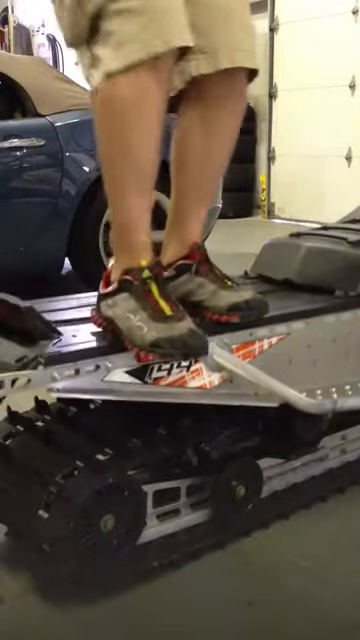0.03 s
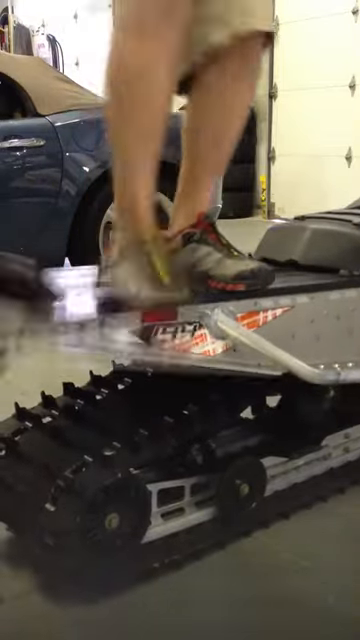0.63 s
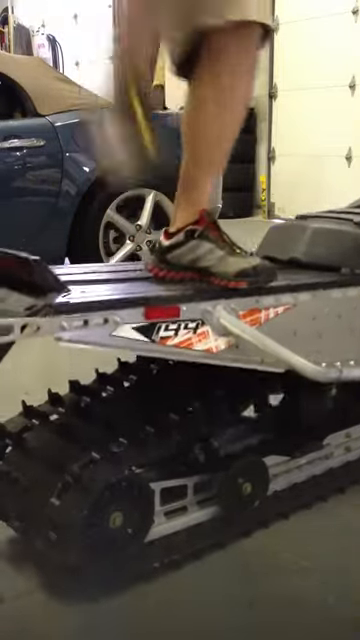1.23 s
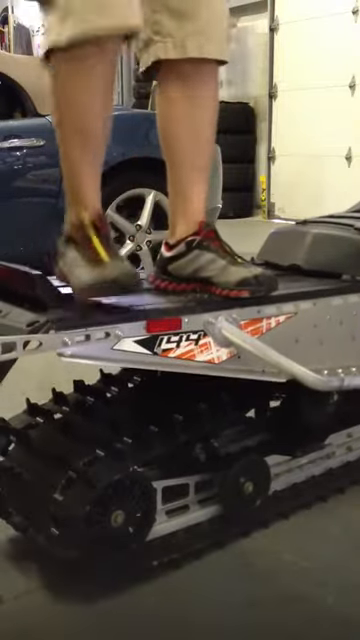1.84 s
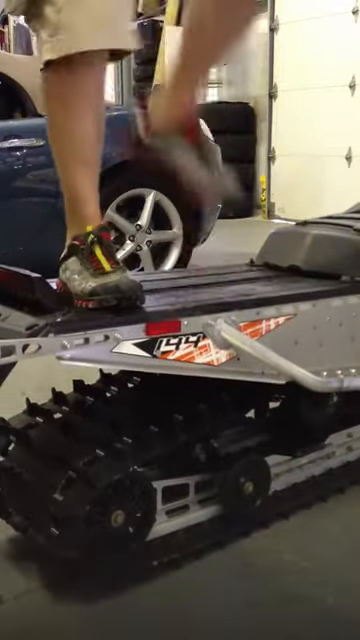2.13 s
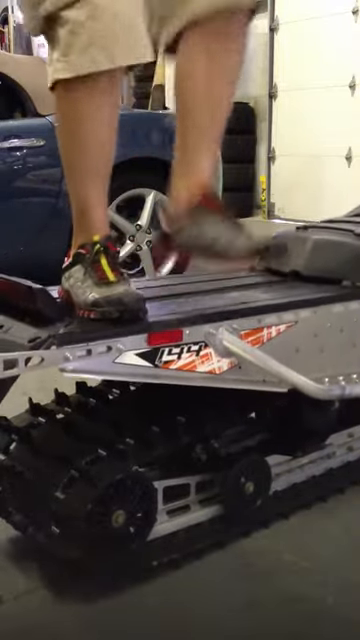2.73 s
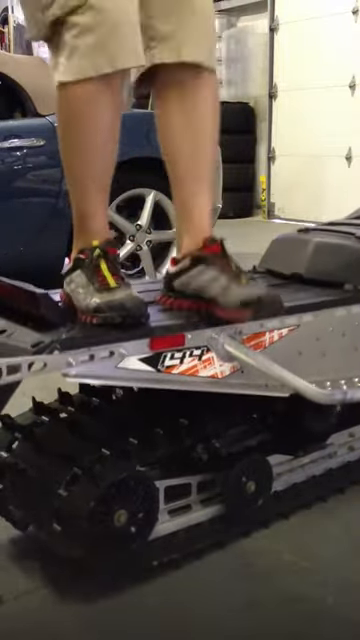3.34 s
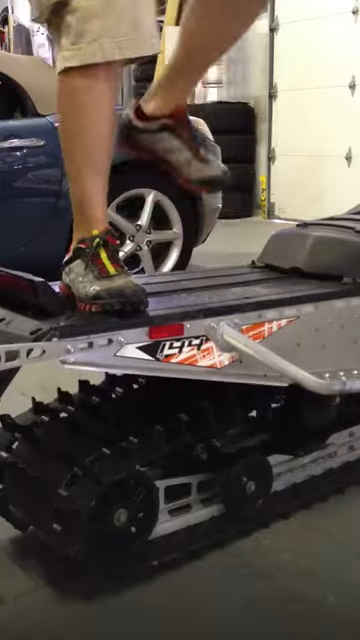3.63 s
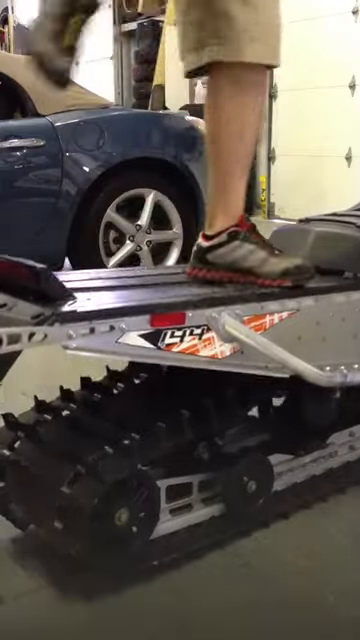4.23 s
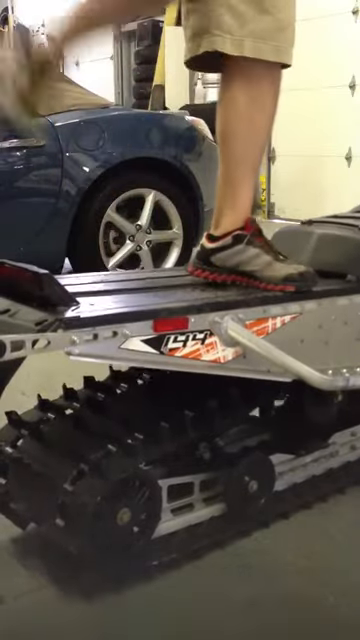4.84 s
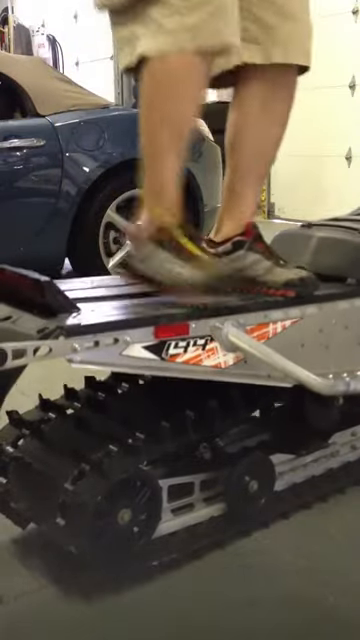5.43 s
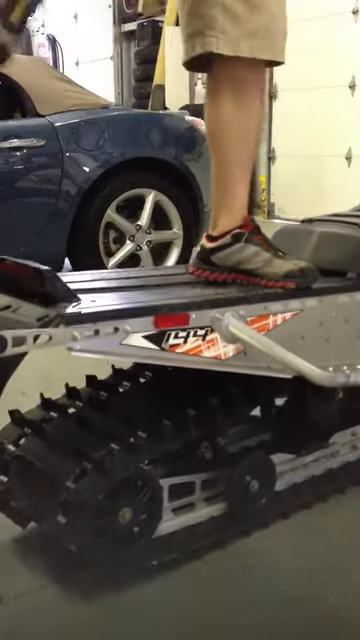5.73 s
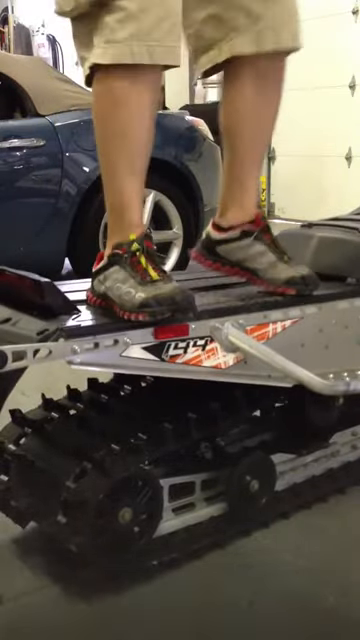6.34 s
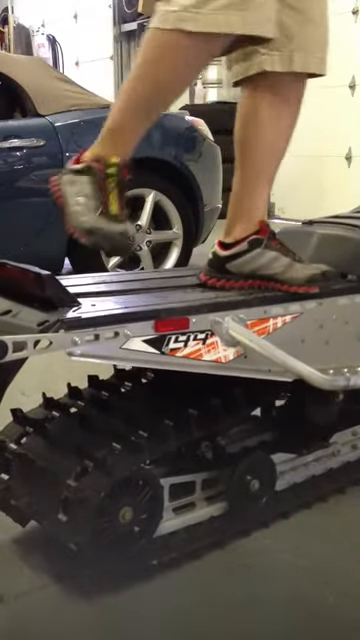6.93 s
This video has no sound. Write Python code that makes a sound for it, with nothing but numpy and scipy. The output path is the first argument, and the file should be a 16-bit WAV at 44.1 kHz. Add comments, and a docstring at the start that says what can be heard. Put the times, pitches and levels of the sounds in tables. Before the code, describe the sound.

Sneakers stomp repeatedly on a metal deck in a garage, each sharp thud booming and ringing briefly over a faint engine rumble.

```python
"""Stomping on a snowmobile in a garage

Sneakers stomp on the coated aluminium tunnel. Each sole lands with a crack, the deck's
modes boom and clang briefly, and the room rings on. Lighter steps, ticks and rubs fall
between, over a small motor's steady hum and a distant engine that fades away."""
import sys
import numpy as np
from scipy import signal
from scipy.fft import rfft, irfft
from scipy.io import wavfile
from scipy.ndimage import uniform_filter1d

SR = 44100
rng = np.random.default_rng(int(sys.argv[2]) if len(sys.argv) > 2 else 0)


def transcribe(signal):
    """Save signal, clipped to [-1, 1], as a 16-bit WAV file at the path in sys.argv[1]."""
    frames = np.atleast_2d(signal).T
    limited = np.clip(frames, -1, 1)
    pcm = np.round(limited * 32767).astype(np.int16)
    wavfile.write(sys.argv[1], SR, pcm)


N = 316178
EDGE_HZ = 15800


def amp(db):
    """Decibels to gain."""
    return 10 ** (np.asarray(db) / 20)


def read(points, hz):
    """Table interpolated over log frequency."""
    f, value = np.transpose(points)
    return np.interp(np.log(hz + 1), np.log(f), value)


def add(mix, start_s, sound):
    """Mix in a sound; start_s may be negative."""
    at = round(start_s * SR)
    sound = sound[max(-at, 0):]
    part = mix[max(at, 0):][:len(sound)]
    part += sound[:len(part)]


def colour(x, curve, size=4096):
    """Minimum-phase filter; curve: f/Hz, gain/dB."""
    log_gain = np.log(amp(read(curve, abs(np.fft.fftfreq(size, 1 / SR)))))
    taps = np.fft.ifft(np.exp(np.conj(signal.hilbert(log_gain)))).real
    return signal.fftconvolve(x, taps[:size // 2])[:len(x)]


def white(count):
    """White noise, density 0 dB re 1/Hz."""
    return rng.standard_normal(count) * np.sqrt(SR / 2)


def wander(count, window):
    """Unit-variance noise smoothed over window samples."""
    return uniform_filter1d(rng.standard_normal(count), window) * np.sqrt(window)


def band(count, hz, octaves):
    """Unit-rms noise in a bell-shaped band."""
    offset = np.log2((np.fft.rfftfreq(count, 1 / SR) + 1) / hz) / octaves
    x = irfft(rfft(white(count)) * np.exp(-offset ** 2), count)
    return x / x.std()


def ringing(t, t60s, size=256):
    """Dense modes as noise, each band with its own decay."""
    hz, frame_s, spectra = signal.stft(white(len(t)), SR, nperseg=size)
    decay = np.exp(-np.log(1000) * frame_s / read(t60s, hz)[:, None])
    return signal.istft(spectra * decay, SR, nperseg=size)[1][:len(t)]


def crack(t, pop_hz, pop_db, snap=0.018, settle_s=0.0027, pop_s=0.0042, pop_rise_s=0.00054):
    """The sole hits in one sharp pulse, the lugs slap down, trapped air pops."""
    # sole-on-metal spectrum: f/Hz, density/dB
    spectrum = [(50, -71), (150, -54), (300, -40), (600, -36.5), (1200, -38.5), (2000, -43.5),
                (4000, -44.5), (8000, -52), (15000, -81)]
    contact = white(len(t)) * np.exp(-t / settle_s)
    contact[0] -= snap * SR / np.sqrt(2)
    pop_envelope = amp(pop_db) * (1 - np.exp(-t / pop_rise_s)) * np.exp(-t / pop_s)
    return colour(contact, spectrum) - pop_envelope * np.sin(2 * np.pi * pop_hz * t)


def knock(t, hz, spot, flex_db=-10, peak_s=0.0027, dip_hz=40, dip_db=-40, dip_s=0.012):
    """The panel flexes a few cycles, damped by the shoe; the whole sled dips."""
    flex = amp(flex_db) * t / peak_s * np.exp(1 - t / peak_s) * np.sin(2 * np.pi * hz * t)
    dip = amp(dip_db) * np.exp(-t / dip_s) * np.sin(2 * np.pi * dip_hz * t)
    return amp(-3 + 10.5 * spot) * (flex + dip)  # louder toward the unsupported rear


def boom(t, spot, rise_s=0.0088, leak_hz=110, scatter_cycles=0.15):
    """Deck modes start almost in phase; the landing spot sets their balance."""
    # tunnel bending modes: f/Hz, level/dB, t60/s, gain per unit spot/dB
    deck = [(123, -32, 0.42, -10), (140.5, -26.5, 0.29, -3), (167.8, -20, 0.46, 6.5), (180, -26, 0.4, 14),
            (213.5, -11.5, 0.25, -0.5), (266, -21.5, 0.063, 16), (272.5, -11.5, 0.14, -3),
            (286.7, -10.5, 0.24, -3.5), (315, -48, 0.2, 33), (333.2, -20.5, 0.28, -5.5),
            (373.6, -29, 0.26, 23), (394, -39.5, 0.79, -1), (440, -32, 0.34, 5), (478, -33, 0.36, 19),
            (605, -25, 0.39, 2.5), (684, -31, 0.41, 7), (819, -32.5, .35, 12), (870, -35.5, 0.53, 6),
            (1177, -39.5, 0.46, -1.5), (1368, -37.5, 0.58, 2), (1550, -49, 0.25, -4), (1820, -43, 0.35, 2),
            (2400, -22.5, 0.12, 3)]
    hz, db, t60_s, rear_db = np.transpose(deck)[:, :, None]
    waves = np.sin(2 * np.pi * (hz * t + scatter_cycles * rng.standard_normal(hz.shape)))
    modes = amp(db + spot * rear_db) * np.exp(-np.log(1000) * t / t60_s) * waves
    leak = signal.butter(2, leak_hz, "high", fs=SR, output="sos")  # open underside cancels deep bass
    return signal.sosfilt(leak, modes.sum(0) * (1 - np.exp(-t / rise_s)))


def clang(t, rattle_db=1.0):
    """The sheet rings densely, and unevenly as its fittings rattle."""
    # crowded sheet modes: f/Hz, density/dB
    spectrum = [(40, -109), (100, -55), (180, -40.5), (330, -39.5), (450, -44), (700, -47), (1200, -47),
                (2000, -56), (3500, -58.5), (7000, -59.5), (15000, -60.5)]
    # sheet decay: f/Hz, t60/s
    t60s = [(150, 0.31), (600, 0.36), (2000, 0.25), (10000, 0.12)]
    rattle = amp(rattle_db * wander(len(t), window=180))
    return colour(ringing(t, t60s) * rattle, spectrum)


def garage(t, first_echo_s=0.0038, build_s=0.0075):
    """Echoes from floor, car and walls thicken into a tail."""
    # diffuse room response: f/Hz, density/dB
    spectrum = [(45, -84.5), (90, -70), (160, -42.5), (280, -50), (450, -62), (1000, -56.5), (2500, -57),
                (4500, -63), (7000, -64), (15000, -63.5)]
    # room decay: f/Hz, t60/s
    t60s = [(150, 0.69), (500, 0.63), (2000, 0.72), (4500, 0.97), (7000, 0.85), (12000, 0.6), (16000, 0.19)]
    build = 1 - np.exp(-np.maximum(t - first_echo_s, 0) / build_s)
    return colour(ringing(t, t60s) * build, spectrum)


def fine_resonances(low_hz=900, count=400, depth_db=3.3):
    """Narrow peaks and dips of one metal sheet: f/Hz, gain/dB."""
    db = rng.uniform(-depth_db, depth_db, count)
    db[0] = 0  # flat below low_hz
    return np.column_stack([np.linspace(low_hz, EDGE_HZ, count), db])


def blow(metal, force_db, hardness_db, crack_db, pop_hz, pop_db, knock_hz, spot):
    """One contact drives deck and room; a harder landing is brighter."""
    t = np.arange(SR) / SR
    contact = amp(crack_db) * crack(t, pop_hz, pop_db) + knock(t, knock_hz, spot)
    ring = boom(t, spot) + colour(clang(t) + garage(t), metal)
    mid_db = force_db + 0.83 * hardness_db
    treble_db = force_db + hardness_db
    top_db = 1.15 * treble_db  # a gentle sole cushions the top octave
    drive = [(330, force_db), (560, mid_db), (1400, mid_db), (2800, treble_db), (12000, top_db)]
    return colour(contact + ring, drive)


def footfalls(crack_drop_db_per_db=0.41, second_crack_db=-6.5):
    """A stomp lands twice, sole edge then the rest; a light step once, softly."""
    # stomps: t/s, force/dB, hardness/dB, pop/Hz, pop/dB, knock/Hz, spot (-1 front, 1 rear),
    # second contact's lag/s, its force re the first/dB
    stomps = [ (-0.15, 3, -5, 800, -6, 280, 0.44, .02, -4), (0.643, -2, 0.5, 696, -3, 303, 0.11, 0.014, 1),
              (1.298, 1, 0.5, 2290, -11, 276, -0.53, 0.012, -15.5),
              (2.401, 4, -1.5, 1253, -8, 253, -0.65, 0.044, -11),
              (3.159, -0.5, -1.5, 735, -1, 290, -0.63, .023, -4.5),
              (3.863, -8, -8.5, 1250, -5, 306, 0.34, 0.015, -18),
              (4.409, 1.5, -2.5, 2320, -12, 321, 0.75, .030, -16.5),
              (5.206, -.5, -2, 1010, -3.5, 282, 0.69, 0.026, -12),
              (5.973, 2.5, -4, 549, -2, 246, 0.21, .012, -12)]
    # light steps: t/s, force/dB
    steps = [(0.010, -22.5), (0.074, -24), (0.100, -23), (1.864, -26), (1.902, -26.5), (6.555, -24.5),
             (6.590, -23.5), (6.606, -35)]
    out, metal = np.zeros(N), fine_resonances()
    for start_s, force_db, hardness_db, *landing, lag_s, second_db in stomps:
        # heavier stomps have less crack relative to their boom and ring
        crack_db = 0.5 - crack_drop_db_per_db * force_db
        edge = blow(metal, force_db, hardness_db, crack_db, *landing)
        rest = blow(metal, force_db + second_db, hardness_db, crack_db + second_crack_db, *landing)
        add(out, start_s, edge)
        add(out, start_s + lag_s, rest)
    for start_s, force_db in steps:
        step = blow(metal, force_db, hardness_db=-7, crack_db=-0.5,
                    pop_hz=1330, pop_db=-5.5, knock_hz=278, spot=0.22)
        add(out, start_s, step)
    return out


def engine(start_hz=45.1, sag_hz_per_s=0.89, waver=0.008):
    """A far engine through the door: low orders of a sinking firing rate, rumble, road hiss."""
    # engine loudness: t/s, level/dB
    loudness = [(0, -39.5), (1.6, -47.5), (3.1, -45.5), (4.3, -49), (4.8, -57.5), (7.17, -54)]
    # harmonics: multiple of firing rate, level re engine/dB
    orders = [(2, -52), (3, 0.5), (4, -7), (5, -18), (6, -11)]
    # rumble and hiss: f/Hz, density re engine/dB
    rumble = [(30, -73), (70, -36), (110, -21), (160, -20), (240, -27.5), (350, -37), (1000, -40.5),
              (3500, -48), (9000, -57)]
    t = np.arange(N) / SR
    firing_hz = (start_hz - sag_hz_per_s * t) * (1 + waver * wander(N, window=6000))
    cycles = np.cumsum(firing_hz) / SR
    tones = sum(amp(db) * np.sin(2 * np.pi * (k * cycles + rng.random())) for k, db in orders)
    envelope = amp(np.interp(t, *np.transpose(loudness)))
    return envelope * (tones + colour(white(N), rumble))


def room_tone():
    """A small motor hums in still air."""
    # motor tones: f/Hz, rms level/dB
    tones = [(118.4, -90), (279.9, -54), (419.9, -65.5), (489.9, -72.5), (559.9, -65.5)]
    # still garage air: f/Hz, density/dB
    air = [(25, -115), (55, -100), (100, -82), (170, -81.5), (300, -85.5), (550, -84.5), (800, -89),
           (1400, -89), (3000, -99), (7000, -100), (15000, -99)]
    t = np.arange(N) / SR
    hum = sum(amp(db) * np.sqrt(2) * np.sin(2 * np.pi * (hz * t + rng.random())) for hz, db in tones)
    return hum + colour(white(N), air)


def rubs(squeak_hz=1340, slip_db=2.2):
    """The suspension rubs and squeaks faintly as weight shifts."""
    # rubs: t/s, length/s, level/dB
    strokes = [(0.242, 0.074, -48), (1.031, 0.065, -46), (1.203, 0.11, -47), (4.124, 0.034, -45),
               (4.381, 0.036, -44), (5.904, 0.078, -48.5), (6.941, 0.051, -49)]
    t, out = np.arange(SR // 2) / SR, np.zeros(N)
    for start_s, length_s, db in strokes:
        swell = np.sin(np.pi * np.minimum(t / length_s, 1))
        gain = amp(db + slip_db * wander(len(t), window=300))
        add(out, start_s, gain * swell * band(len(t), squeak_hz, octaves=0.4))
    return out


def ticks(rise_s=0.0013, decay_s=0.0026, tail_s=0.09, tail_db=-17):
    """Soles and laces tick, with a trace of room."""
    # ticks: t/s, level/dB, centre/Hz
    events = [(0.432, -31.5, 7770), (0.603, -29, 1090), (1.968, -35, 9000), (4.093, -29, 9000),
              (6.2106, -23, 7460), (6.6934, -32.5, 2400)]
    t, out = np.arange(SR // 2) / SR, np.zeros(N)
    tail = amp(tail_db) * np.exp(-t / tail_s)
    envelope = (np.exp(-t / decay_s) + tail) * (1 - np.exp(-t / rise_s))
    for start_s, db, hz in events:
        add(out, start_s, amp(db) * envelope * band(len(t), hz, octaves=1.74))
    return out


def scene():
    """All sources, mono."""
    return (footfalls() + ticks() + rubs() + engine() + room_tone())[None]


def record(dry, ceiling=0.69):
    """Microphone port colour, soft clip, band limit."""
    # port response: f/Hz, gain/dB
    port = [(3300, -5.5), (4200, -2.5), (4750, 0.5), (5120, -11.5), (5900, -6), (6900, -2), (8000, -6.5),
            (9700, -16), (11800, -8), (13500, -13), (15300, -18)]
    x = colour(dry[0], port)
    x = x / (1 + (x / ceiling) ** 4) ** (1 / 4)
    low_pass = signal.firwin(255, EDGE_HZ, window=("kaiser", 9), fs=SR)
    return signal.fftconvolve(x, low_pass, "same")[None]


dry = scene()
out = record(dry)
transcribe(out)
```